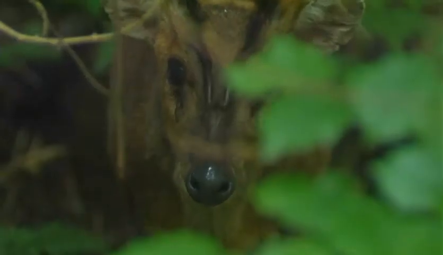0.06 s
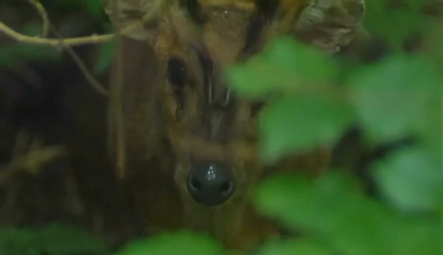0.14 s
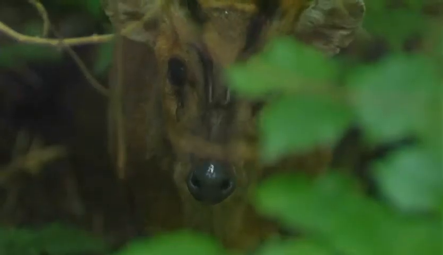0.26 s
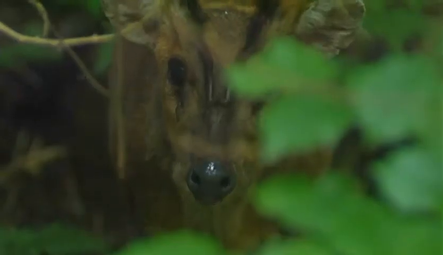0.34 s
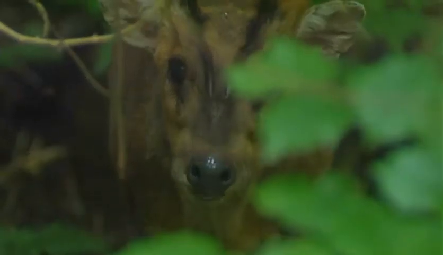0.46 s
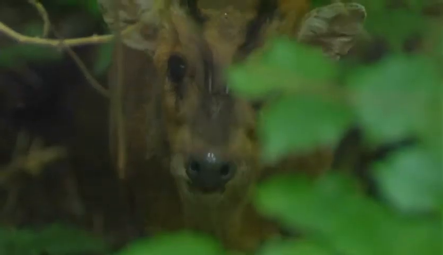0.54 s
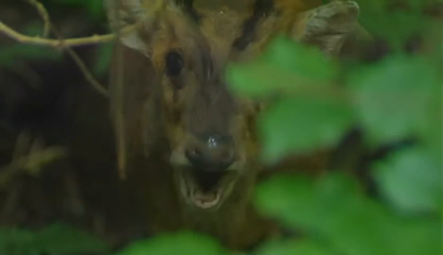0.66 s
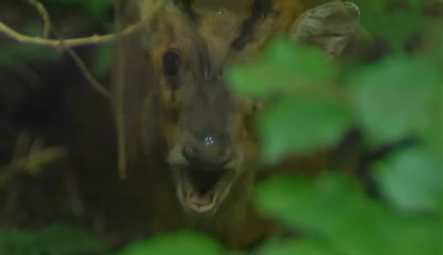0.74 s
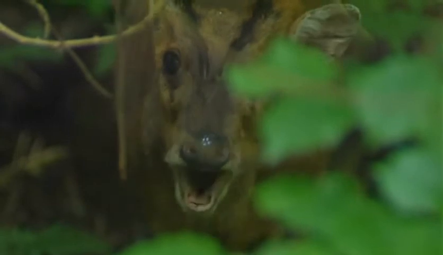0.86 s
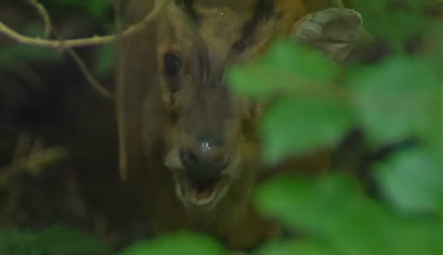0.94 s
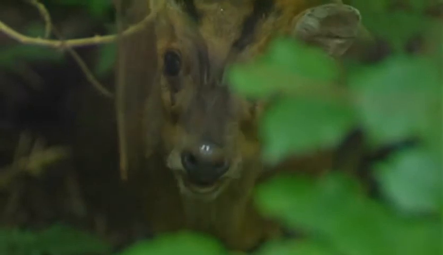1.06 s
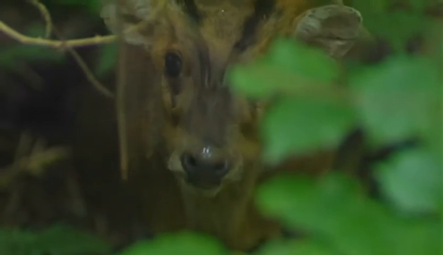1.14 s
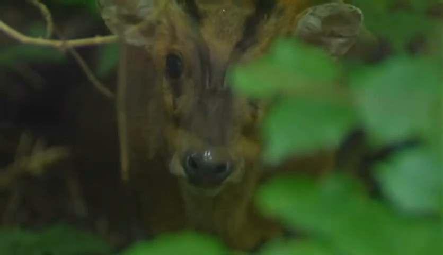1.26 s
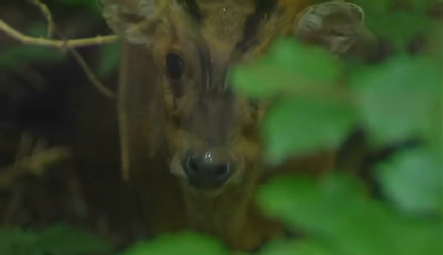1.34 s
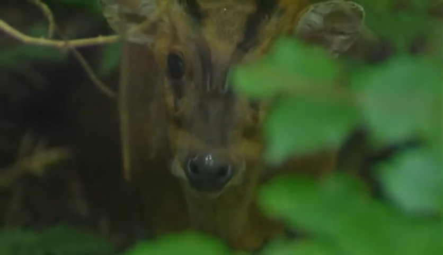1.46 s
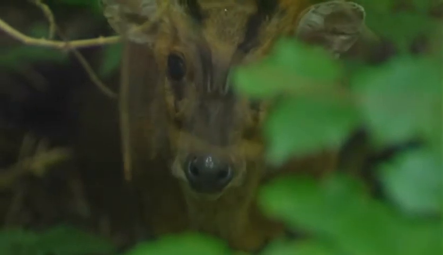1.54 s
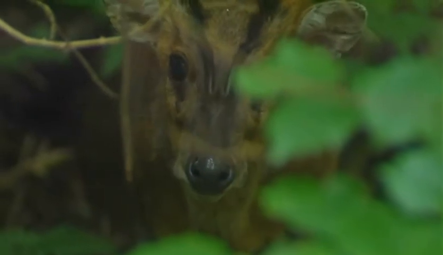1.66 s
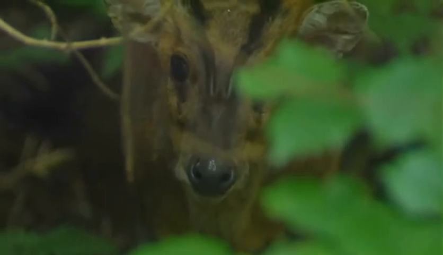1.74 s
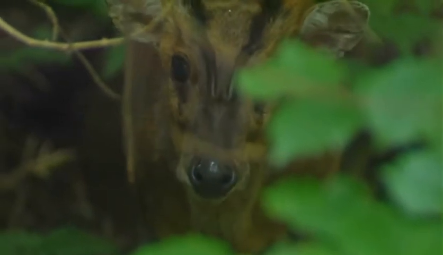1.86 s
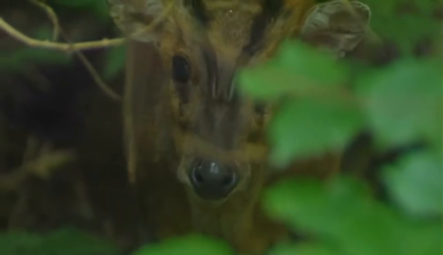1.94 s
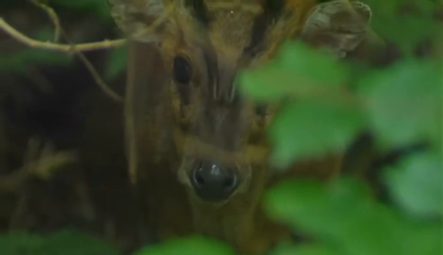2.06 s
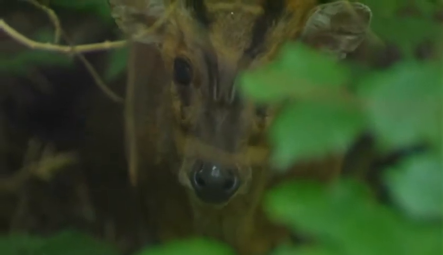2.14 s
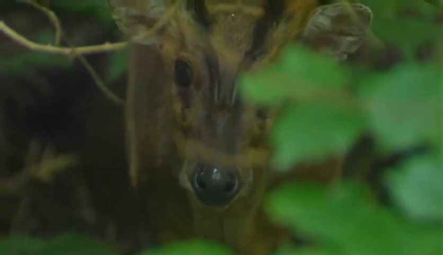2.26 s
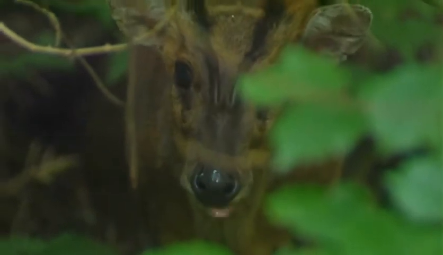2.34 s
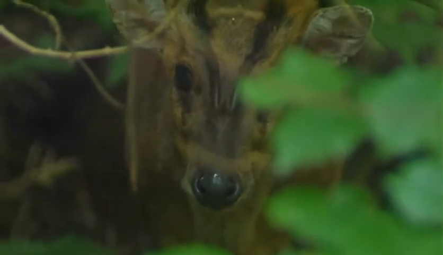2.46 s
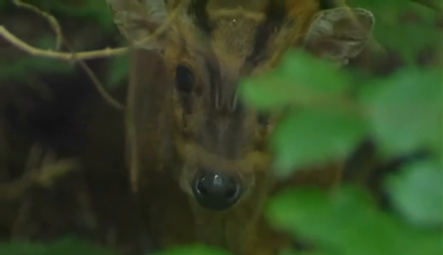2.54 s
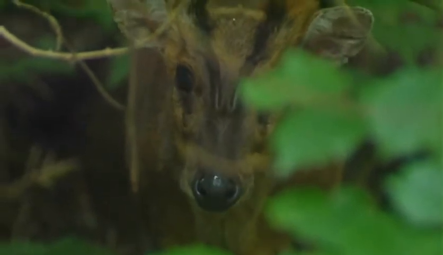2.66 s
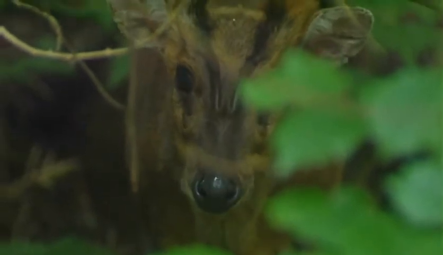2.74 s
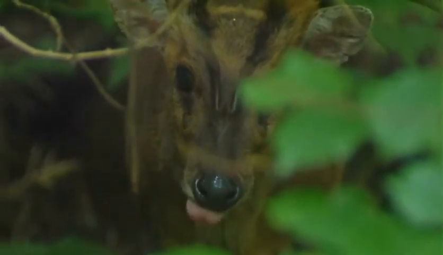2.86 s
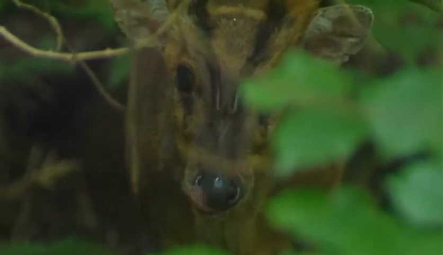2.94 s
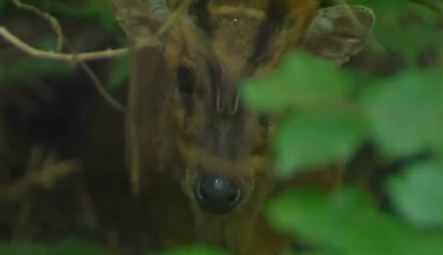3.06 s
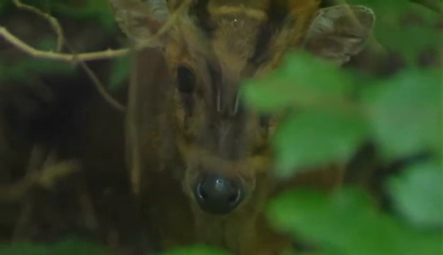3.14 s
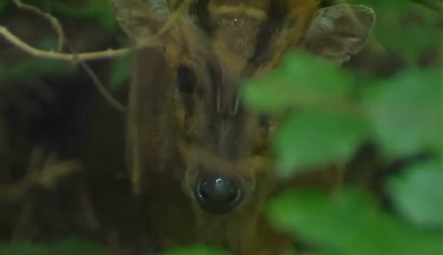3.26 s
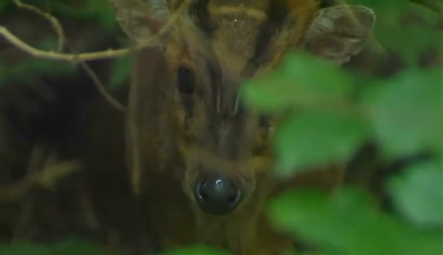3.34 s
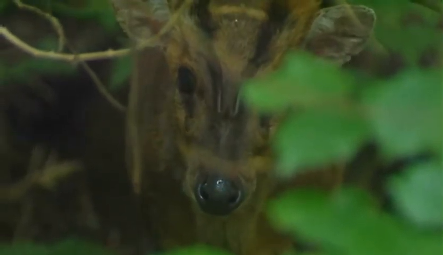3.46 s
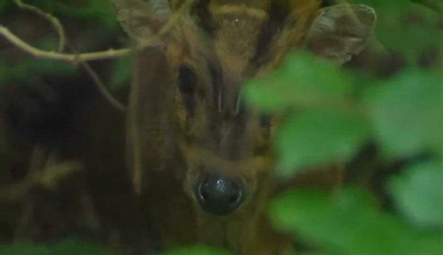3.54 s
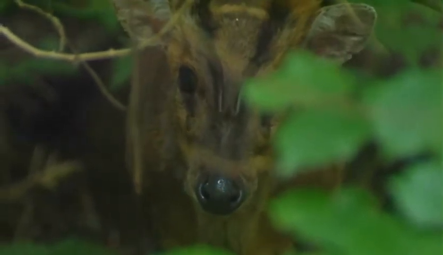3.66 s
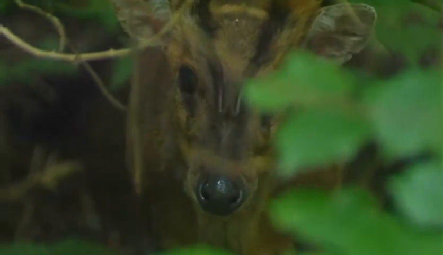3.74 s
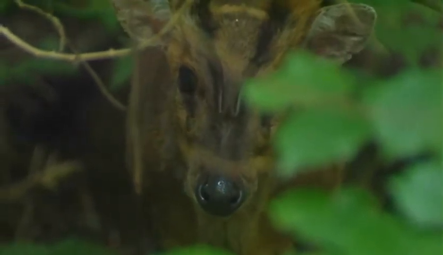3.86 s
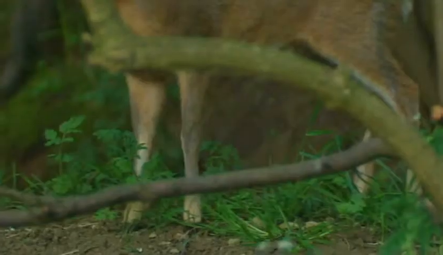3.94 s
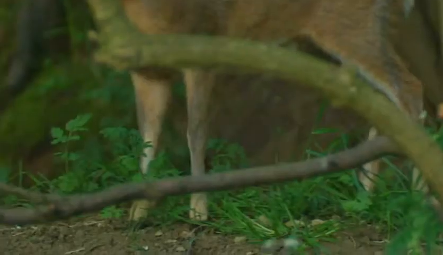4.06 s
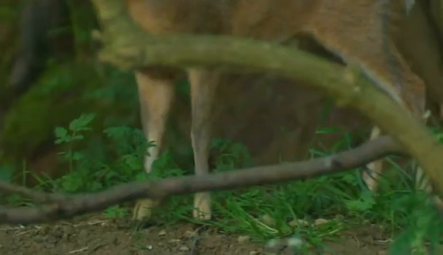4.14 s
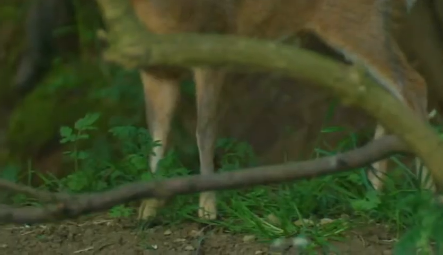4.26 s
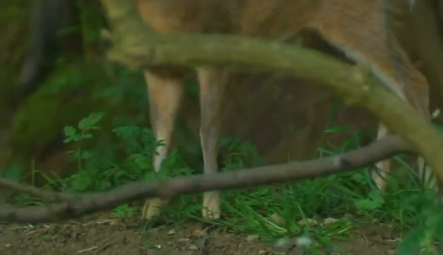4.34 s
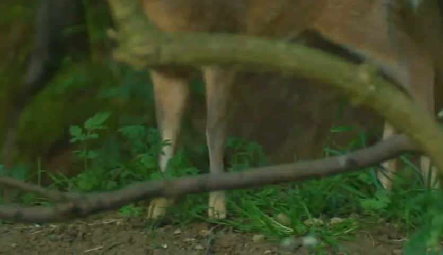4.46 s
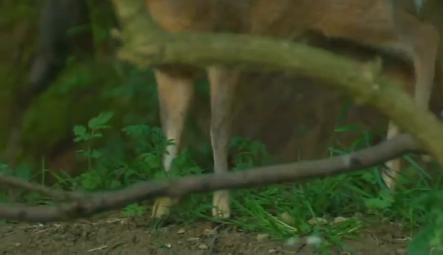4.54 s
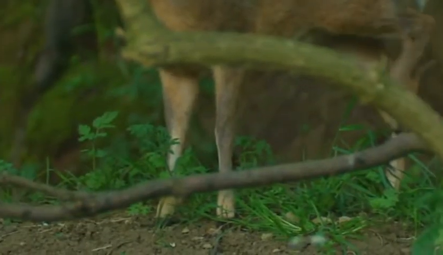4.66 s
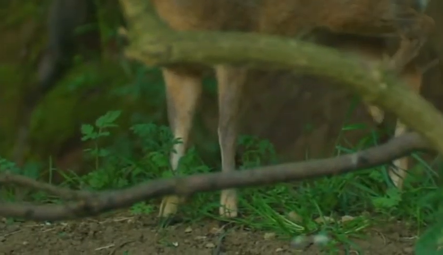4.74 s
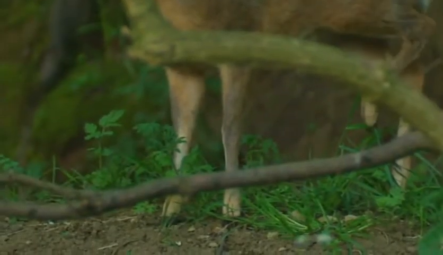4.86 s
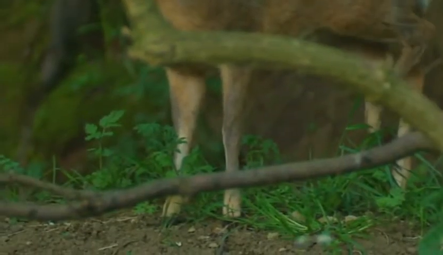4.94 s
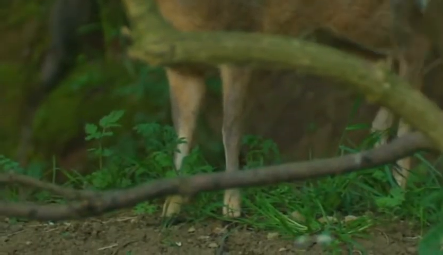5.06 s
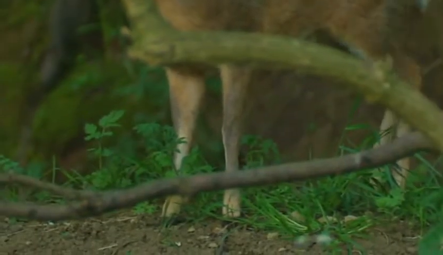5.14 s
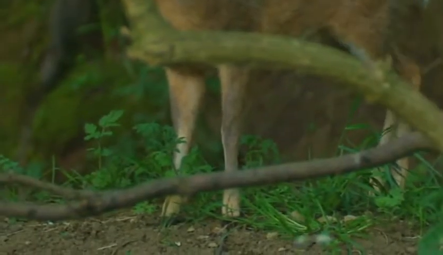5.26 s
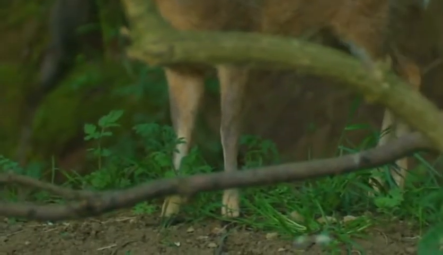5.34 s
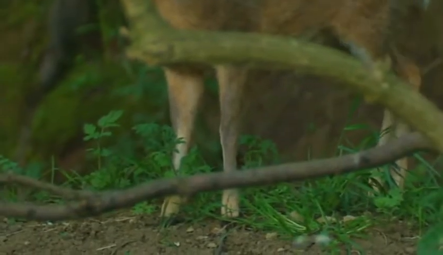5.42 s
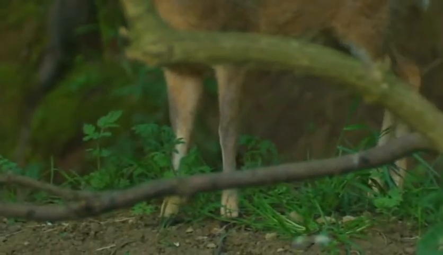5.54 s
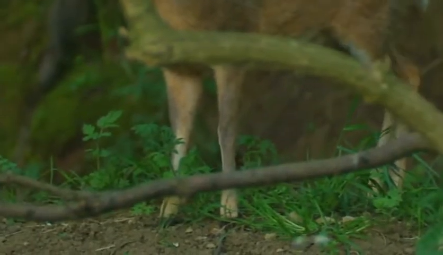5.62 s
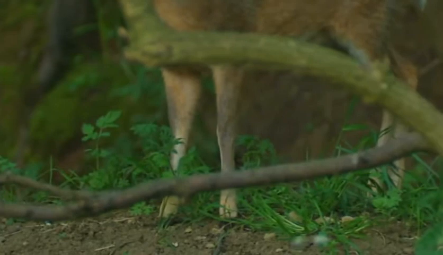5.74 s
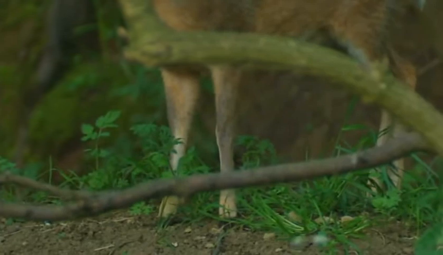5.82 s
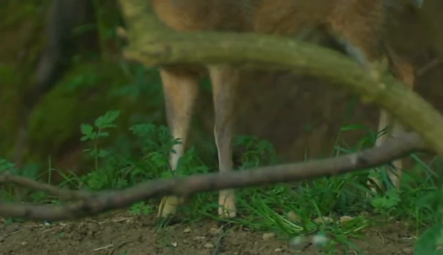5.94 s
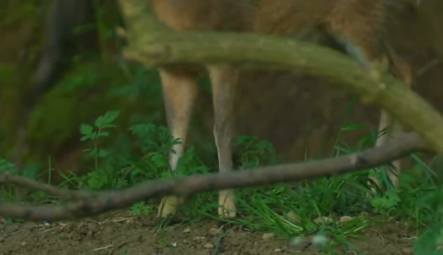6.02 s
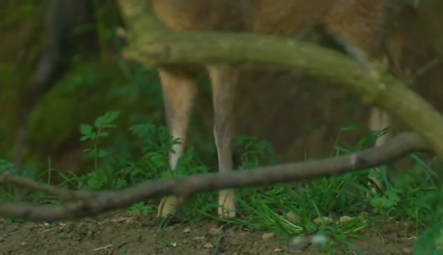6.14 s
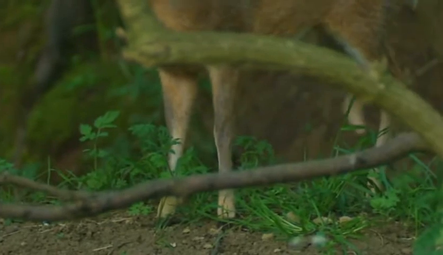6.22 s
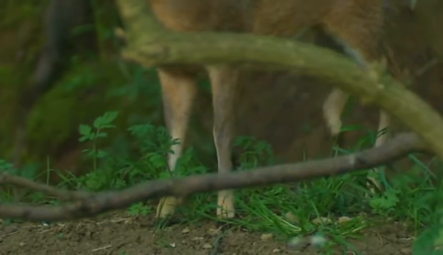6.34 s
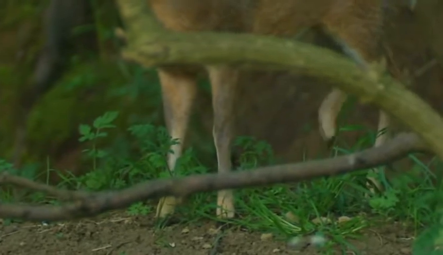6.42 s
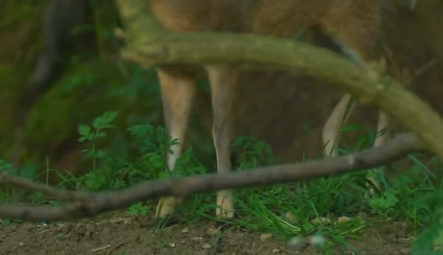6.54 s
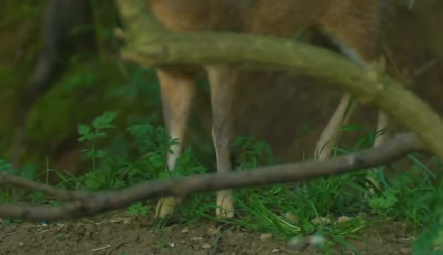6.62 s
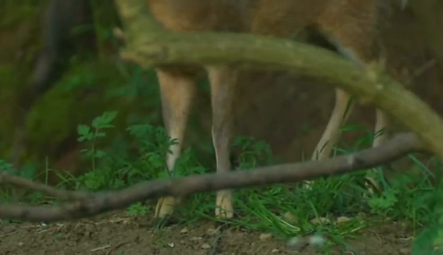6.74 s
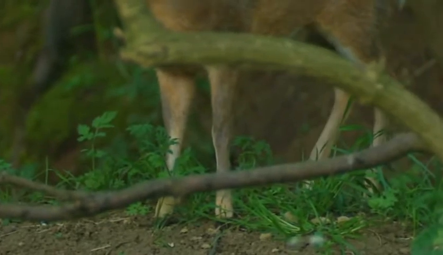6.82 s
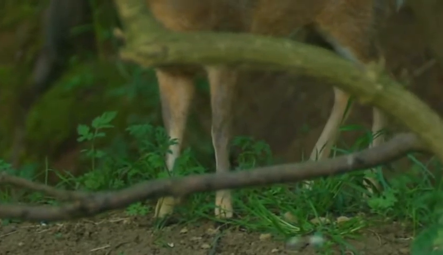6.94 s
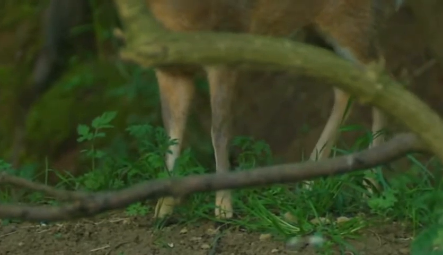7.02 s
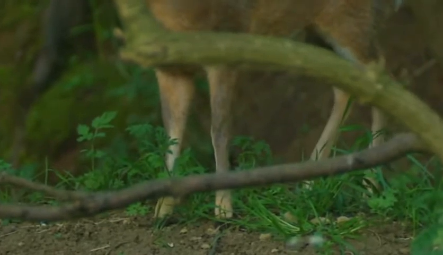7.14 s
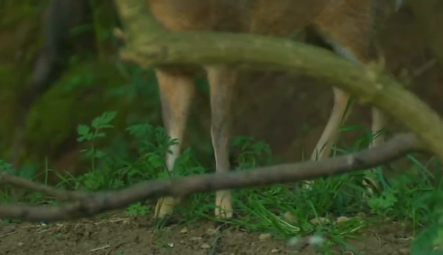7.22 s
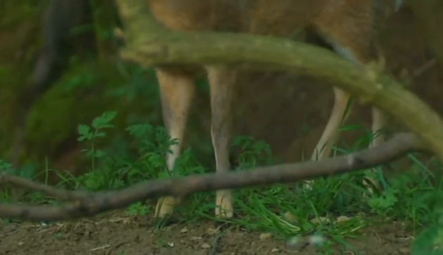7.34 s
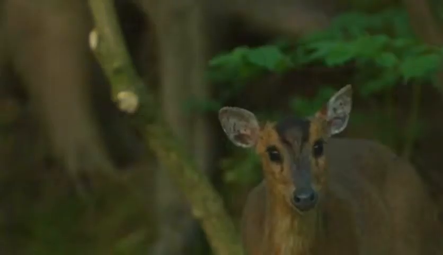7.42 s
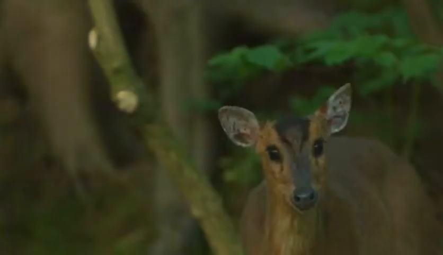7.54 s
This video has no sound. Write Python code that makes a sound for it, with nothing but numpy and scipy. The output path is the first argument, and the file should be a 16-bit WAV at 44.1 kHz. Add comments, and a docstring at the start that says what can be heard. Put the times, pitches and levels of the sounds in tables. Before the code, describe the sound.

In quiet woodland a small deer gives a loud, short, hoarse bark, then two more at intervals of a little over two seconds. Each rings briefly among the trees with a dull distant answer. High birds chirp sparsely at first, then whistle and trill thickly in the second half. Near the end a hoof faintly stirs leaves. The barks sit close and central; the birds spread wide in stereo.

```python
"""Birdsong in a wood, with three hoarse alarm barks of a small deer: fold pulses and gated air noise.
Throughout, a far chorus of glides and patchy noise blurs into the echo of the trees over a soft noise drone.
From 0.6 s each bark comes with a spell of low rumble noise; the first spell also carries a faint hum.
From 1.1 s near birds whistle and trill in gliding sines, with a different stereo phase from note to note.
At 6.6 s a hoof briefly stirs the leaves: a burst of noise."""
import sys
import numpy as np
from scipy import signal
from scipy.fft import rfft, irfft, next_fast_len
from scipy.io import wavfile
from scipy.ndimage import uniform_filter1d, map_coordinates

SR = 44100
rng = np.random.default_rng(int(sys.argv[2]) if len(sys.argv) > 2 else 0)


def wav_out(sig):
    """Save sig, one row per channel (or a flat mono array), as 16-bit PCM at SR to the path in sys.argv[1]."""
    wavfile.write(sys.argv[1], SR, np.round(np.clip(np.atleast_2d(sig).T, -1, 1) * 32767).astype(np.int16))


N = 334278

# Deer barks. Each row: start in seconds, length in seconds, onset in seconds, time to the top of the
# pitch arch in seconds, top pitch in Hz, level in dB before swell, locks and rough loss,
# hoarseness 0-1, mouth gain in dB at 700, 2200 and 2700 Hz.
BARKS = [ (.688, 0.37, .029, .2, 707.4, -19.5, .65, -4, -6, 6.5),
         (3.012, .36, .015, .18, 716.6, -21.5, 0.75, -4, 1, -1.5),
         (5.255, .39, .027, .21, 716, -24, 0.44, -6, 3.5, 1)]
# Moments when the voice locks into a clear tone; the first bark breaks twice to a higher register.
# Each row: start in seconds, length in seconds, pitch in Hz, extra level in dB.
CLEAR_LOCKS = [(.873, .022, 858, 5.5), (.91, .05, 850, 5.5), (5.42, .07, 714, -1)]
# What throat and mouth pass of the fold pulses. Each row: frequency in Hz, gain in dB.
THROAT_SPECTRUM = [(350, -21), (600, 5), (1300, 1), (1750, -1), (2200, -6), (2650, -10), (3400, -18.5),
                   (4000, -23.5), (4700, -19.5), (11000, -65)]
# What throat and mouth pass of the turbulent air. Each row: frequency in Hz, gain in dB.
RASP_SPECTRUM = [(400, -26), (800, -7), (1250, 3.5), (2000, -13.5), (2750, -2), (3300, -7), (3900, -21.5),
                 (4700, -9), (5300, -22), (6000, -22), (7200, -42), (11000, -42.5)]
# Dull answer of a far slope. Each row: frequency in Hz, gain in dB.
SLOPE_SPECTRUM = [(300, -9.5), (720, -1.5), (2000, -31.0)]
# Single near bird notes. Each row: start in seconds, length in seconds, pitch in Hz at start, middle
# and end, peak in dB before the birds' mix, key into PHASE_LEAD_RAD.
WHISTLES = [(1.125, .035, 5000, 6500, 6800, -44, "oblique"),
            (1.187, .048, 6850, 5850, 5560, -40, "oblique"), (1.295, .064, 3400, 3850, 4250, -42, "ahead"),
            (1.92, .17, 5000, 4600, 4500, -57, "ahead"), (2.125, .1, 4250, 4050, 4300, -54, "ahead"),
            (2.42, .12, 4100, 4050, 4100, -54, "ahead"), (2.62, .05, 6100, 5300, 5700, -53, "ahead"),
            (3.5, .06, 5900, 5900, 6700, -41, "ahead"), (3.56, .074, 6890, 6450, 5000, -44, "ahead"),
            (3.63, .068, 3400, 3750, 4390, -43, "ahead"), (3.636, .098, 6890, 7800, 6980, -37, "aside"),
            (3.646, .036, 6070, 5250, 4310, -38, "ahead"), (4.029, .122, 7880, 8220, 8300, -41, "ahead"),
            (4.119, .116, 4130, 3950, 4690, -33, "aside"), (4.21, .13, 5250, 4980, 4780, -27, "ahead"),
            (4.27, .07, 4200, 3900, 4000, -35, "aside"), (4.55, .05, 5000, 6000, 5600, -36, "aside"),
            (4.385, .025, 6300, 7550, 8300, -39, "ahead"), (4.4, .2, 8750, 8600, 8500, -44, "aside"),
            (4.725, .04, 6000, 7100, 6500, -29, "ahead"), (4.765, .055, 6500, 6950, 7300, -28, "ahead"),
            (4.77, .055, 3900, 4200, 4650, -38, "ahead"), (4.847, .052, 5340, 4100, 3490, -29, "ahead"),
            (5.214, .086, 5510, 6300, 6030, -32, "ahead"), (5.458, .068, 8600, 8500, 8900, -43, "ahead"),
            (5.665, .06, 6100, 6600, 4900, -34, "ahead"), (5.84, .1, 5200, 4800, 4500, -45, "ahead"),
            (6.2, .054, 5900, 5350, 5900, -29, "aside"), (6.308, .1, 5940, 5200, 4700, -28, "ahead"),
            (6.457, .05, 5800, 6800, 5800, -33, "ahead"), (6.902, .1, 4870, 4520, 4180, -33, "aside"),
            (7.06, .07, 5800, 5200, 5000, -35, "aside"), (7.341, .186, 7700, 7480, 6500, -40, "ahead")]
# Repeated near bird notes. Each entry: start in seconds, period in seconds, count, note length in seconds,
# pitch in Hz along the note, peak in dB of first, middle and last note before the birds' mix,
# key into PHASE_LEAD_RAD.
TRILLS = [ dict(start=1.305, period=.196, count=2, length=.048, hz=(4870, 4970, 5300, 6600),
          db=(-39, -41, -42), where="oblique"),
          dict(start=1.39, period=.19, count=2, length=.03, hz=(6850, 5700, 4600), db=(-35, -38, -41),
          where="oblique"), dict(start=2.077, period=.232, count=2, length=.17, hz=(3640, 3210, 3900, 4100),
          db=(-46, -46, -47), where="aside"),
          dict(start=3.76, period=.085, count=3, length=.032, hz=(5500, 5000, 4600), db=(-40, -40, -37),
          where="ahead"), dict(start=4.3, period=.134, count=3, length=.062, hz=(4200, 4060, 4660, 4570),
          db=(-34, -34, -36), where="ahead"),
          dict(start=4.465, period=.139, count=2, length=.082, hz=(4000, 3800, 3840, 4300),
          db=(-34, -34, -34), where="ahead"),
          dict(start=4.688, period=.1845, count=5, length=.042, hz=(6100, 5300, 4000), db=(-32, -31, -32),
          where="aside"), dict(start=4.742, period=.1865, count=5, length=.026, hz=(5400, 5900, 5800),
          db=(-33, -32, -33), where="aside"),
          dict(start=4.944, period=.0293, count=9, length=.012, hz=(6500, 5000, 3600), db=(-42, -40, -41),
          where="ahead"), dict(start=5.545, period=.05, count=2, length=.025, hz=(5400, 4700, 3900),
          db=(-34, -34, -34), where="ahead"),
          dict(start=5.632, period=.0925, count=6, length=.045, hz=(5450, 4050, 3250), db=(-36, -34, -35),
          where="aside"), dict(start=5.655, period=.127, count=5, length=.02, hz=(2800, 3100, 2900),
          db=(-49, -47, -48), where="ahead"),
          dict(start=5.725, period=.127, count=4, length=.025, hz=(4100, 3300, 2800), db=(-48, -46, -44),
          where="ahead"),
          dict(start=5.768, period=.187, count=3, length=.13, hz=(7500, 8500, 8550, 8350, 8000, 6900),
          db=(-35, -33, -41), where="ahead"),
          dict(start=6.29, period=.205, count=3, length=.135, hz=(6700, 7400, 7450, 7300, 6500),
          db=(-29, -30, -33), where="oblique"),
          dict(start=6.549, period=.0637, count=12, length=.03, hz=(3900, 5050, 5350, 5650, 5900, 6150),
          db=(-28, -28, -40), where="ahead"),
          dict(start=7.163, period=.0895, count=5, length=.042, hz=(3600, 4600, 5900), db=(-41, -40, -41),
          where="aside")]
# Phase lead of the left side in radians, by key.
PHASE_LEAD_RAD = dict(ahead=0, oblique=2.4, aside=2.8)
# Far chorus gain. Each row: time in seconds, gain in dB on the chorus mix.
CHORUS_GAIN = [(0, -49), (1.2, -49), (2.2, -55.5), (3, -48), (3.8, -39.5), (4.5, -45), (5.3, -35), (7, -41),
               (7.58, -39)]
# Frequency range of the far birds' blur. Each row: frequency in Hz, gain in dB.
SONG_SPECTRUM = [(2400, -32.5), (3200, 0.5), (5000, 5), (7300, -1.5), (8000, -28), (11200, -27)]
# Echo decay among the trunks. Each row: frequency in Hz, time to fall 60 dB in seconds,
# before each echo's own factor.
TREE_DECAY = [(400, 1.08), (2500, 1.155), (9000, 0.41)]
# Drone. Each row: frequency in Hz, gain in dB.
DRONE_SPECTRUM = [(120, -27.5), (230, -10.5), (420, -6), (1400, -21.5), (3000, -17.5), (8000, -27.5),
                  (11200, -28)]
# Rumble spells. Each row: start in seconds, length in seconds, gain in dB at the start, fall in dB per second.
RUMBLE_SPELLS = [(0.636, 1.59, -67.5, 1.5), (2.998, 1.4, -68.5, 7), (5.257, 2.0, -77, 7)]
# Rumble colour. Each row: frequency in Hz, gain in dB.
RUMBLE_SPECTRUM = [(20, -12), (70, -0.5), (170, -0.5), (260, -27), (600, -92.0)]
# A hoof stirs the leaves. Each row: time in seconds, gain in dB.
RUSTLE_GAIN = [(6.55, -71), (6.68, -50), (6.9, -57), (7.05, -80.5)]
# Leaf colour. Each row: frequency in Hz, gain in dB.
LEAF_SPECTRUM = [(1500, -24), (3200, 8.5), (4500, -4), (11000, -55)]

ARCH_HZ_PER_S2, SCOOP_HZ_PER_S = 3300, 4300  # sag both sides of the top; initial upward scoop
SWELL_DB_PER_S, RELEASE_S, RELEASE_DB = 1049.5, .035, 15  # initial climb; final drop
CLEAR_START_S, CLEAR_END_S, ROUGHEN_S, ROUGH_LOSS_DB = .065, .03, .05, 2.5  # loss at roughness 1
LOCK_EDGE_S = .005
HUM_HZ, HUM_END_S = 150, 2.5
TOP_HZ = 11250


def deer():
    """Barks near the centre, each with a quick near echo, a faint long one and a far slope's dull answer."""
    out = np.zeros((2, N))
    for row in BARKS:
        voice = np.zeros((1, N))
        hz, db, rough = effort(*row[:7])
        sound = bark(hz, db, rough, row[7:])
        voice[0, round(row[0] * SR):][:len(sound)] = sound
        slope = np.roll(coloured(voice, SLOPE_SPECTRUM), round(.4 * SR), axis=1)  # 0.4 s late
        out += voice * amp([[-.4], [.3]])
        out += amp(-8) * echo(voice, .8, longer=.29)
        out += amp(-25) * echo(voice, .95, longer=1.16)
        out += amp(-31) * echo(slope, .8, longer=.5)
    return out


def effort(start, length, onset_s, top_s, top_hz, db, hoarse):
    """Pitch arches, level swells and drops, and the voice is hoarse between clear ends, save for locks."""
    t = np.arange(0, length, 1 / SR)
    onset = onset_s * np.exp(-t / onset_s)
    hz = top_hz - ARCH_HZ_PER_S2 * (t - top_s) ** 2 - SCOOP_HZ_PER_S * onset
    roughen = ramp(t - CLEAR_START_S, ROUGHEN_S)
    clear = ramp(length - CLEAR_END_S - t, ROUGHEN_S)
    rough = hoarse * roughen * clear
    release = ramp(t - length + RELEASE_S, RELEASE_S)
    db = db - SWELL_DB_PER_S * onset - RELEASE_DB * release
    for s, lasts, lock_hz, extra_db in CLEAR_LOCKS:
        lock = ramp(start + t - s, LOCK_EDGE_S) * ramp(s + lasts - start - t, LOCK_EDGE_S)
        hz = hz + (lock_hz - hz) * lock
        db = db + extra_db * lock
        rough = rough * (1 - lock)
    return hz, db - ROUGH_LOSS_DB * rough, np.clip(rough, 0, 1)


def bark(hz, db, rough, mouth_db):
    """Fold pulses that turn unsteady and alternate in size as the voice roughens, plus air gated each cycle."""
    n = len(hz)
    jitter = (.003 + .02 * rough) * wobble(220, n)
    turn = 2 * np.pi * np.cumsum(hz * (1 + jitter)) / SR
    pulses = -np.cos(np.arange(1, 13)[:, None] * turn).sum(0)  # 12 harmonics
    # strong and weak cycles: lines halfway between harmonics
    uneven = 1 + .6 * rough * np.cos(turn / 2 + 0.97 * wobble(30, n))
    shimmer = amp(4.5 * rough * wobble(110, n))
    folds = unit(coloured(pulses * uneven * shimmer, THROAT_SPECTRUM))
    gate = 1 + 0.58 * np.cos(turn)
    air = unit(coloured(rng.standard_normal(n) * gate, RASP_SPECTRUM))
    air_share = .025 + .65 * rough ** 1.5  # of the power
    voice = np.sqrt(1 - air_share) * folds + np.sqrt(air_share) * air
    low_db, mid_db, high_db = mouth_db
    mouth = [(100, 0), (700, low_db), (1200, 0), (1700, 0), (2200, mid_db), (2700, high_db), (3500, 0)]
    fade = ramp(np.arange(n)[::-1] / SR, 0.009)
    return amp(db) * fade * unit(coloured(voice, mouth))


def birds():
    """Near whistles and trills, the left side slightly louder than the right, trailed by their echo."""
    notes = WHISTLES + [row for t in TRILLS for row in trill(**t)]
    near = whistle([(*row, PHASE_LEAD_RAD[where]) for *row, where in notes])
    return near * amp(0) * np.array([[1], [1]]) * amp([[.6], [-.6]]) + amp(-8.0) * echo(near, 0, longer=0.68)


def trill(start, period, count, length, hz, db, where):
    """Rows of one note at a steady beat, levels interpolated over first, middle and last."""
    levels = np.interp(np.linspace(0, 2, count), range(3), db)
    return [(start + k * period, length, *hz, level, where) for k, level in enumerate(levels)]


def whistle(rows):
    """Gliding sines with soft ends, left and right offset in phase."""
    out = np.zeros((2, N + SR))
    for s, length, *hz, db, lead_rad in rows:
        u = np.linspace(0, 1, round(length * SR))
        knots = u * (len(hz) - 1)
        pitch = map_coordinates(np.array(hz, float), [knots], order=2, mode="nearest")
        turn = 2 * np.pi * np.cumsum(pitch) / SR + np.array([[lead_rad], [-lead_rad]]) / 2
        swell = np.sin(np.pi * u ** 0.86) ** 0.55
        out[:, round(s * SR):][:, :len(u)] += amp(db) * swell * np.sin(turn)
    return out[:, :N]


def chorus(count=420):
    """Many far random glides and their echo over a noise blur with random time-frequency patches."""
    a = rng.random((count, 8))
    start_s = a[:, 0] * N / SR
    length_s = .012 + .04 * a[:, 7] ** 2
    centre_hz = 3500 * 1.9 ** a[:, [1]]
    slant = 0.38 * (a[:, [2]] - .6) * np.linspace(-1, 1, 4)
    glide_hz = centre_hz * (1 + slant + .08 * (a[:, 3:7] - .5))
    far = whistle(np.c_[start_s, length_s, glide_hz, 8 * a[:, 3], 2 * np.pi * a[:, 4]])
    z = signal.stft(pair(-0.83), nperseg=256)[2]
    patches = uniform_filter1d(uniform_filter1d(rng.standard_normal(z.shape), 4, 1), 30, 2)
    patchy = signal.istft(z * amp(7 * unit(patches)), nperseg=256)[1][:, :N]
    blur = unit(coloured(patchy, SONG_SPECTRUM))
    far_echo = unit(echo(far, 0, longer=0.17))
    mix = amp(-11.0) * unit(far) + amp(-16.5) * far_echo + amp(-11.0) * blur
    return amp(curve(CHORUS_GAIN)) * mix


def rumble():
    """Spells of lumpy low noise, with a phase-wandering hum in the first."""
    t = np.arange(N) / SR
    early = t < HUM_END_S
    hum = early * (.6 * np.sin(2 * np.pi * HUM_HZ * t + wobble(3, N)))
    lumps = amp(np.where(early, 1.5, 6) * wobble(14, N))
    low = unit(coloured(pair(1.0), RUMBLE_SPECTRUM)) * lumps
    spells = np.zeros(N)
    for s, length, db, fall_db_per_s in RUMBLE_SPELLS:
        edges = ramp(t - s, 0.027) * ramp(s + length - t, .1)
        spells += amp(db - fall_db_per_s * (t - s)) * edges
    return spells * (low + hum)


def rustle():
    """Stirred leaves: coloured noise of randomly flickering level."""
    leaves = unit(coloured(pair(0.94), LEAF_SPECTRUM)) * amp(3.7 * wobble(40, N))
    return amp(curve(RUSTLE_GAIN)) * leaves


def drone():
    """Steady coloured noise."""
    return amp(-60.5) * unit(coloured(pair(.35), DRONE_SPECTRUM))


def echo(x, alike, longer):
    """Scattered answer of the trunks: noise whose frequencies die at their own speeds."""
    hz, t, z = signal.stft(pair(alike)[:, :SR * 3 // 2], SR, nperseg=256)
    t60_s = longer * along(TREE_DECAY, hz)[:, None]
    tail = signal.istft(z * amp(-60 * t / t60_s), SR, nperseg=256)[1]
    return signal.fftconvolve(x, tail / np.linalg.norm(tail[0]), axes=1)[:, :N]


def pair(alike):
    """Stereo white noise with the given left-right correlation."""
    mid, side = rng.standard_normal((2, N)) * np.sqrt([[1 + alike], [1 - alike]])
    return np.array([mid + side, mid - side])


def coloured(x, points):
    """x through a minimum-phase filter of (Hz, dB) points, falling steeply below the first."""
    m = 2 * next_fast_len(x.shape[-1] // 2 + 4096)
    db = along([(points[0][0] / 2, -100)] + points, np.fft.rfftfreq(m, 1 / SR))
    cepstrum = irfft(np.log(amp(db)), m)
    cepstrum[1:m // 2] *= 2  # fold to make it causal
    cepstrum[m // 2 + 1:] = 0
    return irfft(rfft(x, m) * np.exp(rfft(cepstrum)), m)[..., :x.shape[-1]]


def wobble(rate, size):
    """Smooth random curve, rate knots a second."""
    knots = rng.standard_normal(int(size * rate / SR) + 4)
    return map_coordinates(knots, [np.arange(size) * rate / SR])


def along(points, hz):
    """(Hz, value) points interpolated on a log frequency axis."""
    f, v = np.transpose(points)
    return np.interp(np.log(hz + 1), np.log(f + 1), v)


def curve(rows):
    """One value per sample from (s, value) rows."""
    return np.interp(np.arange(N) / SR, *np.transpose(rows))


def ramp(t, rise_s):
    """0 before t = 0, 1 after rise_s."""
    return np.clip(t / rise_s, 0, 1)


def amp(db):
    """Amplitude factor of a level in dB."""
    return 10 ** (np.asarray(db) / 20)


def unit(x):
    """x scaled to an RMS of 1."""
    return x / np.sqrt(np.mean(x ** 2) + 1e-20)


def scene():
    """Sum of all sources."""
    return deer() + birds() + chorus() + rumble() + rustle() + drone()


def record(dry):
    """Zero-phase low-pass; two passes take off 120 dB above the band limit."""
    low_pass = signal.cheby2(16, 60, TOP_HZ, fs=SR, output="sos")
    return signal.sosfiltfilt(low_pass, dry)


dry = scene()
out = record(dry)
wav_out(out)
```